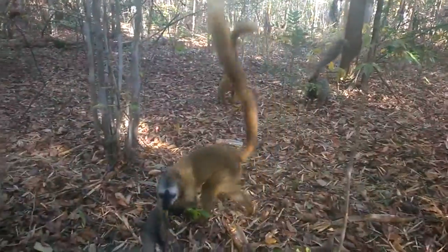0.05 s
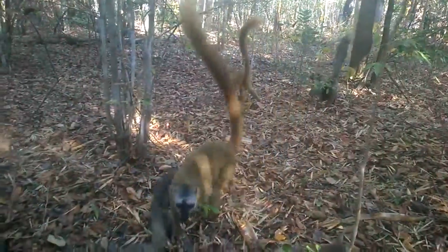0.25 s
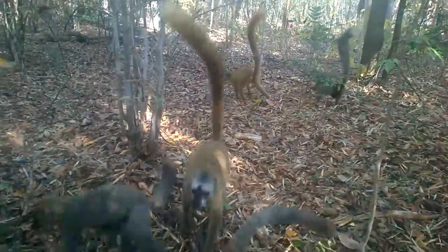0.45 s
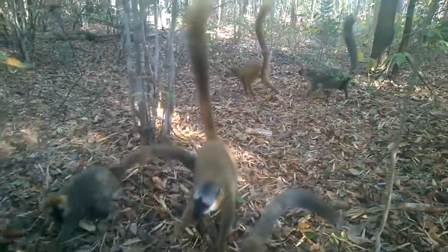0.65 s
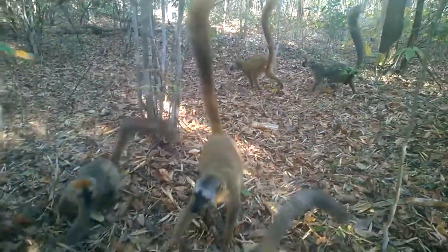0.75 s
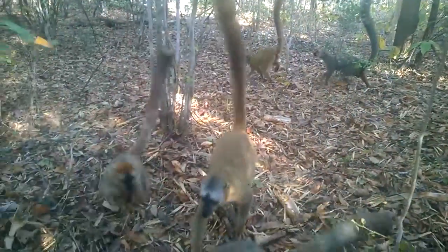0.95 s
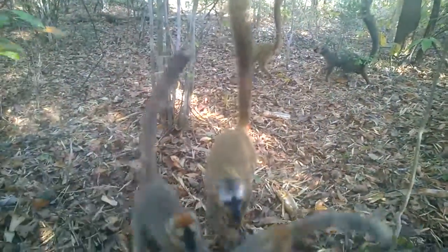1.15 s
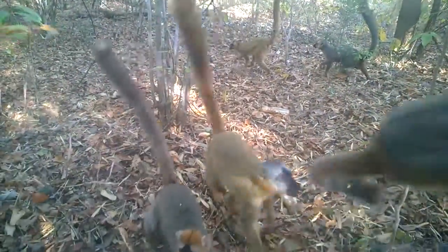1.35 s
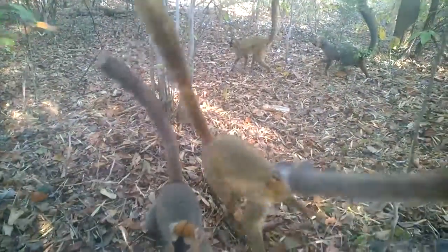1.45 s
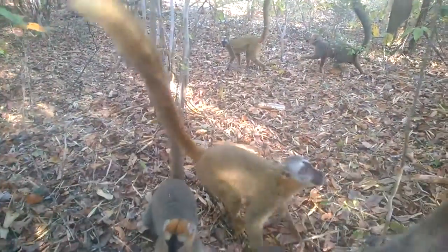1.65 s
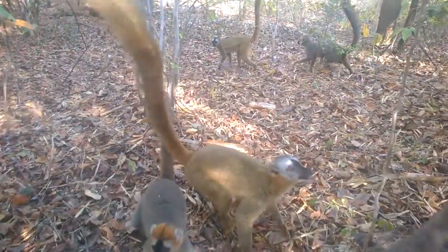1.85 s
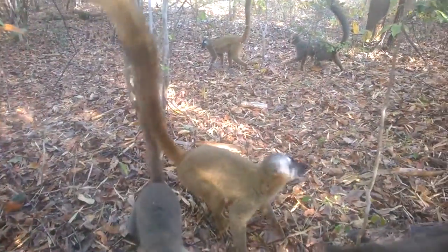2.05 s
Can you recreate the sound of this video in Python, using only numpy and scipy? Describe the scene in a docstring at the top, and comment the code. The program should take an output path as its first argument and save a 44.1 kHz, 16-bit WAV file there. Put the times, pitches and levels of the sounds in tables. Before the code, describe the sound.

Several lemurs grunt very close to the microphone, low stuttering pulses mixed with raspy breaths and short gliding hums; noses sniff, a dry leaf ticks, and a faint high cricket pulses in the quiet forest before calls fade.

```python
"""Dry forest floor with lemurs close to the microphone: throughout, far hush, thin insect tones and low air rumble.
A cricket pulses in two phrases with a short gap past 1 s. Rasps open the scene; from 0.14 s come grunts, slow
vocal-fold pulses ringing a throat sac, mouth and nose, soon with short gliding hums between them.
Noses sniff from 0.5 s as hissing air, and dry leaves tick from 0.76 s as decaying noise bursts.
The calls thin out after 1.6 s, and one faint grunt pulse comes near the end."""
import sys
import numpy as np
from scipy import signal
from scipy.fft import rfft, irfft, next_fast_len
from scipy.io import wavfile
from scipy.ndimage import uniform_filter1d, map_coordinates

SR = 44100
rng = np.random.default_rng(int(sys.argv[2]) if len(sys.argv) > 2 else 0)


def wrap_up_sound(samples):
    """Save the sound to the file named by the first command line argument, as 16-bit audio."""
    columns = np.atleast_2d(samples).T
    # keep every value between -1 and 1, then stretch to whole-number steps
    tamed = np.clip(columns, -1, 1)
    steps = np.round(tamed * 32767).astype(np.int16)
    wavfile.write(sys.argv[1], SR, steps)


N = 92610  # samples, 2.1 s

# Colour of the far forest hush: (frequency [Hz], relative density [dB])
HUSH_COLOUR = [(15, 13), (25, -14), (49, 5), (66, 5), (583, -12.5), (972, -5.5), (1660, -21), (1800, -17.5),
               (2120, -19), (3090, -17.5), (3940, -11.5), (4630, -24), (15500, -29)]
HUSH_DB = -66.5
# Air puffing on the microphone: (time [s], level before a 3.5 dB cut [dB])
RUMBLE_LEVEL = [(0.0, -57), (0.03, -51), (0.12, -78), (0.57, -47), (0.6, -82), (0.69, -57), (0.82, -80),
                (0.96, -56), (1.06, -77), (1.29, -53), (1.32, -79), (1.38, -56), (1.46, -66), (1.59, -57),
                (1.63, -82), (2.1, -93)]
# Colour of that rumble: (frequency [Hz], relative level [dB])
RUMBLE_COLOUR = [(15, -22), (45, 0), (75, -5), (120, -30), (300, -90)]
RUMBLE_LUMPS_DB = 2.5

# Cricket loudness: (time [s], level before a 7 dB lift [dB])
CRICKET_LEVEL = [(0.0, -73), (0.58, -70.5), (2.05, -73), (2.1, -69.5)]
# Cricket phrases: (start [s], end [s])
CRICKET_PHRASES = [(0, 1.04), (1.123, 2.1)]
CHIRP_PERIOD_S, CHIRP_S, CHIRP_HZ = .0551, .04, 4000
# Farther insects holding tones: (frequency [Hz], level [dB])
INSECT_TONES = [(3590, -74.5), (2926, -81), (1423, -87.5), (1996, -83), (4150, -80.5), (8100, -95)]
TONE_WAVER_HZ = 5.07

# Leaf ticks: (time [s], level before the 3 dB cut and leaf resonance [dB])
LEAF_TICKS = [(0.7624, -23.5), (1.053, -31.5), (1.0965, -55)]
TICK_T60_S = .012

# Sniffs: (start [s], length [s], level [dB], centre [Hz])
NOSE_SNIFFS = [(0.509, 0.096, -64.5, 9500), (0.591, 0.077, -73.5, 9500), (0.648, 0.11, -62.5, 9850),
               (0.782, 0.11, -79, 9300), (1.185, 0.081, -58, 10270), (1.238, 0.077, -58.5, 11300),
               (1.492, 0.053, -74.5, 8540)]
SNIFF_OCTAVES, SNIFF_TAIL_DB, SNIFF_LUMPS_DB = 0.26, -4.5, 1.5

# Rasps: (start [s], length [s], low-band level [dB], middle against low [dB], treble against low [dB])
THROAT_RASPS = [(-.03, 0.097, -55.5, -30, -26), (0.059, 0.12, -61, -16, -22), (0.15, 0.1, -50, -22, -33),
                (0.221, 0.11, -51.5, -23.5, -29), (0.318, 0.072, -49, -13.5, -15),
                (0.347, 0.16, -48.5, -22.5, -34), (0.488, 0.1, -42, -12.5, -19.5),
                (0.566, 0.093, -51, -14.5, -18), (0.642, 0.1, -45, -12.5, -11.5),
                (0.728, 0.075, -55.5, -15, -13.5), (0.791, 0.098, -56, -11.5, -7.5),
                (0.872, 0.15, -49, -13, -14), (0.998, 0.13, -55.5, -10.5, -14.5),
                (1.125, 0.088, -43, -17.5, -26.5), (1.202, 0.039, -36.5, -6, -10.5),
                (1.246, 0.04, -35.5, -9, -20.5), (1.273, 0.034, -49.5, 1, -6.5),
                (1.341, 0.049, -38.5, -10.5, -25), (1.369, 0.087, -36.5, -28, -29),
                (1.468, 0.074, -52, -10, -20), (1.536, 0.04, -41.5, -7.5, -18),
                (1.65, 0.11, -54.5, -14.5, -18.5)]
# Colours of the three rasp bands: (frequency [Hz], relative level [dB])
RASP_LOW_COLOUR = [(60, -29), (200, -3), (330, -7), (450, -15.5), (750, -15.5), (1100, -20), (1400, -42.5),
                   (2000, -78)]
RASP_MIDDLE_COLOUR = [(1000, -60), (1400, -1.5), (1900, -4), (2500, -12.5), (3100, -21), (4000, -62)]
RASP_TREBLE_COLOUR = [(2800, -34), (3600, -1.5), (4400, -10), (5200, -0.5), (6000, -8.5), (7000, -16.5),
                      (9000, -44)]
RASP_LUMPS_DB, TREBLE_LUMPS_DB = 3, 4.5

# Hums: (start [s], length [s], first pitch [Hz], last pitch [Hz], level [dB])
MOUTH_HUMS = [(0.199, 0.032, 224.5, 232, -35.5), (0.241, 0.028, 230, 230, -43),
              (0.28, 0.011, 215, 217, -39), (0.304, 0.013, 240, 246, -41), (0.328, 0.044, 255, 267.7, -32),
              (0.369, .05, 285, 269, -33), (0.541, 0.075, 211, 215.5, -42), (0.99, 0.019, 252, 245, -33),
              (1.159, 0.034, 290.4, 288, -30.5), (1.24, 0.013, 250, 263, -29.5),
              (1.323, 0.017, 205, 198, -34.5), (1.389, 0.073, 300, 400, -38),
              (1.425, 0.16, 105, 120.4, -48), (1.573, 0.015, 232, 208, -34),
              (1.602, 0.198, 165.4, 86.2, -54.5), (1.64, 0.075, 420, 521, -51.5),
              (1.668, 0.038, 1050, 1212, -58.5), (1.73, 0.034, 235, 225, -50.5)]
OVERTONE_DB, WAVER_HZ, HUM_FLUTTER_DB = -20, 8, 1.8

# Grunts: (first pulse [s], turning moment [s], level there [dB], start drop [dB], end drop [dB],
#          sac [Hz], mouth [Hz], mouth level [dB], nose level [dB], softness of closure [ms]);
# a negative drop is louder than the turning moment
GRUNT_CALLS = [(.143, 0.154, -31.5, 3.5, 0.5, 266, 744, -5.5, -13.5, 0.13),
               (0.334, 0.333, -24, -11, -10.5, 240, 730, -18.5, -29.5, 1.8),
               (0.371, .397, -15, 6, 14, 266, 788, -12, -29, 2),
               (0.427, 0.434, -30.5, -0.5, -6.5, 260, 704, -30, -31, 1.8),
               (0.506, 0.519, -20, 8.5, 18, 218, 800, -3, -13.5, 0.35),
               (.671, 0.667, -33, 1, -3.5, 198, 820, -12, -29, 0.27),
               (0.761, 0.743, -33.5, 4, 12, 215, 505, -4, -29, 3),
               (0.88, 0.961, -17.5, 19, 3, 230, 758, -1.5, -14.5, 0.89),
               (1.136, 1.162, -25.5, 4, 3, 273, 810, 4, -12, .4),
               (1.198, 1.2, -24, -2.5, -4.5, 227, 774, -2, -17.5, 0.17),
               (1.266, 1.271, -18.5, 3, 32, 270, 773, -0.5, -11, .4),
               (1.355, 1.355, -26.5, -3.5, 2.5, 226, 780, -1.5, -15.5, 0.28),
               (1.499, 1.512, -34.5, 14, -5.5, 230, 790, -16, -26, 1.1),
               (1.542, 1.551, -18.5, 6, 4, 201, 875, -0.5, -7, 0.83),
               (1.976, 1.973, -38.5, 4, -1.5, 317, 594, -12, -25, 0.88)]
# Pulse rhythm of each grunt, same order: (pulses [count], first gap [ms], gap growth [ms per pulse])
GRUNT_BEATS = [(2, 18, 0), (3, 9.3, 0), (4, 13.5, 0), (4, 11, 0), (8, 11.5, 0), (4, 10, 3), (5, 14, 0),
               (8, 14.6, 0), (3, 11.7, 0), (3, 17.5, -3), (3, 7.5, 13), (6, 10.2, .6), (3, 14, 0),
               (3, 6, 7), (1, 0, 0)]
# Nose resonances: (frequency [Hz], width [Hz], level against the grunt's nose level [dB])
NOSE_RESONANCES = [(1880, 260, 0), (4650, 450, -6), (5450, 450, -6)]
SAC_WIDTH_HZ, MOUTH_WIDTH_HZ = 115, 300
JITTER_S, SCATTER_DB = .0004, 2.5
EFFORT_BRIGHTENS = .3  # extra dB lost by mouth and nose per dB of drop

ECHO_DB, ECHO_T60_S, ECHO_DULL_HZ = -13.5, 0.14, 2570
BODY_LOW_HZ = 78.7
TOP_HZ = 15720


def amp(db):
    """dB to gain."""
    return 10 ** (np.asarray(db) / 20)


def unit(x):
    """Scale to rms 1."""
    return x / np.sqrt(np.mean(x ** 2) + 1e-20)


def curve(rows):
    """One value per sample from (time [s], value) rows."""
    return np.interp(np.arange(N) / SR, *np.transpose(rows))


def wobble(rate):
    """A smooth random curve of rms 1, with rate knots a second."""
    knots = rng.standard_normal(int(N * rate / SR) + 4)
    return unit(map_coordinates(knots, [np.arange(N) * rate / SR]))


def filtered(x, response):
    """Multiply the spectrum of x by a response of frequency."""
    m = next_fast_len(N + SR // 2)
    return irfft(rfft(x, m) * response(np.fft.rfftfreq(m, 1 / SR)), m)[:N]


def noise(points):
    """Noise of rms 1 coloured by (frequency [Hz], level [dB]) points."""
    f, db = np.transpose(points)

    def colour(hz):
        return amp(np.interp(np.log(hz + 1), np.log(f + 1), db))
    return unit(filtered(rng.standard_normal(N), colour))


def swell(start, length, power):
    """A bump from start to start + length; a smaller power gives steeper sides."""
    progress = np.clip((np.arange(N) / SR - start) / length, 0, 1)
    return np.sin(np.pi * progress).clip(0) ** power


def air():
    """Far forest hush as steady coloured noise, and low air rumble puffing on the microphone."""
    hush = amp(HUSH_DB + 0.17 * wobble(4.16)) * noise(HUSH_COLOUR)
    rumble_db = curve(RUMBLE_LEVEL) - 3.5 + RUMBLE_LUMPS_DB * wobble(20.3)
    return hush + amp(rumble_db) * noise(RUMBLE_COLOUR)


def insects():
    """A cricket switches one tone on and off in two phrases; farther insects hold unsteady tones."""
    t = np.arange(N) / SR
    on = sum((t > a) * (t < b) * ((t - a) % CHIRP_PERIOD_S < CHIRP_S) for a, b in CRICKET_PHRASES)
    gate = uniform_filter1d(1. * on, size=150)  # soft chirp edges
    tone = np.sin(2 * np.pi * CHIRP_HZ * t + 0.23 * wobble(14))
    out = amp(curve(CRICKET_LEVEL) + 7 + wobble(15)) * gate * tone
    for hz, db in INSECT_TONES:
        phase = 2 * np.pi * np.cumsum(hz + TONE_WAVER_HZ * wobble(25.96)) / SR
        out += amp(db + 0.93 * wobble(11.23)) * np.sin(phase)
    return out


def ticks():
    """Dry leaves snap: fast-decaying noise through a leaf resonance and a little upper crackle."""
    out, t = np.zeros(N), np.arange(SR // 40) / SR
    for start, db in LEAF_TICKS:
        burst = amp(db - 3 - 60 * t / TICK_T60_S) * rng.standard_normal(len(t))
        out[round(start * SR):][:len(t)] += burst

    def leaf(hz):
        resonance = 1j * hz * 500 / (1550 ** 2 - hz ** 2 + 1j * hz * 500)
        crackle = 0.027 * 1j * hz / (3000 + 1j * hz) / (1 + 1j * hz / 7000)
        return resonance + crackle
    return filtered(out, leaf)


def sniffs():
    """Air hisses through nostrils: a narrow noise band over a tail rising towards its centre."""
    out = np.zeros(N)
    for start, length, db, centre in NOSE_SNIFFS:
        def nostril(hz):
            band = np.exp(-.5 * (np.log2((hz + 1) / centre) / SNIFF_OCTAVES) ** 2)
            return band + amp(SNIFF_TAIL_DB) * (hz < centre) * hz / centre
        hiss = unit(filtered(rng.standard_normal(N), nostril))
        out += amp(db + SNIFF_LUMPS_DB * wobble(120)) * swell(start, length, 1.86) * hiss
    return out


def rasps():
    """Lumpy turbulence in throat, mouth and nose; the upper bands come in sharper grains."""
    low = noise(RASP_LOW_COLOUR) * unit(amp(RASP_LUMPS_DB * wobble(90)))
    grains = unit(amp(TREBLE_LUMPS_DB * wobble(220)))
    middle, treble = noise(RASP_MIDDLE_COLOUR) * grains, noise(RASP_TREBLE_COLOUR) * grains
    out = np.zeros(N)
    for start, length, db, middle_db, treble_db in THROAT_RASPS:
        breath = low + amp(middle_db) * middle + amp(treble_db) * treble
        out += amp(db) * swell(start, length, 0.75) * breath
    return out


def hums():
    """Closed-mouth tones gliding between two pitches, with one overtone."""
    out = np.zeros(N)
    for start, length, first, last, db in MOUTH_HUMS:
        pitch = curve([(start, first), (start + length, last)]) + WAVER_HZ * wobble(40)
        phase = 2 * np.pi * np.cumsum(pitch) / SR
        tone = np.sin(phase) + amp(OVERTONE_DB) * np.sin(2 * phase)
        out += amp(db + HUM_FLUTTER_DB * wobble(70.06)) * swell(start, length, 0.73) * tone
    return out


def grunts():
    """Each fold closure is a pull of air that rings sac, mouth and nose; harder pulls are brighter."""
    out, t = np.zeros(N + SR), np.arange(SR // 16) / SR
    for call, (count, gap, growth) in zip(GRUNT_CALLS, GRUNT_BEATS):
        start, turn, db, start_drop, end_drop, sac, mouth, mouth_db, nose_db, soft = call
        cavities = [(mouth, MOUTH_WIDTH_HZ, mouth_db)]
        cavities += [(f, w, nose_db + g) for f, w, g in NOSE_RESONANCES]
        hz, width, level = np.transpose(cavities)[:, :, None]
        u = np.pi * width * t
        k = np.arange(count)
        times = start + (gap * k + growth * k * (k - 1) / 2) / 1000
        for s, r in zip(times, rng.standard_normal((count, 10))):
            drop = np.interp(s, [start, turn, max(turn, times[-1]) + 1e-4], [start_drop, 0, end_drop])
            upper_db = level - EFFORT_BRIGHTENS * drop + SCATTER_DB * r[1:5, None]
            upper = amp(upper_db) * u * np.exp(-u)
            cavity_hz = hz * (1 + 0.045 * r[5:9, None])  # shifts a little each pulse
            ring = (upper * np.sin(2 * np.pi * cavity_hz * t + .5 * r[9])).sum(0)
            onset = 1 - np.exp(-1000 * t / abs(soft))
            ring += np.exp(-np.pi * SAC_WIDTH_HZ * t) * np.sin(2 * np.pi * sac * t) * onset
            out[round((s + JITTER_S * r[0]) * SR):][:len(t)] -= amp(db - drop) * ring
    return out[:N]


def echo(x):
    """Ground and trunks scatter a short dull tail."""
    t = np.arange(SR // 4) / SR
    tail = rng.standard_normal(len(t)) * amp(-60 * t / ECHO_T60_S)
    wet = signal.fftconvolve(x, tail / np.linalg.norm(tail))[:N]
    return filtered(wet, lambda hz: 1 / (1 + 1j * hz / ECHO_DULL_HZ))


def scene():
    """All sources at one microphone; small bodies radiate little bass, and the close calls and ticks echo."""
    close = ticks() + rasps() + hums() + grunts()
    near = filtered(close, lambda hz: (1j * hz / (BODY_LOW_HZ + 1j * hz)) ** 2)
    return (air() + insects() + sniffs() + near + amp(ECHO_DB) * echo(near))[None]


def record(dry):
    """The recorder keeps nothing above its band limit."""
    return filtered(dry[0], lambda hz: hz < TOP_HZ)[None]


dry = scene()
out = record(dry)
wrap_up_sound(out)
```